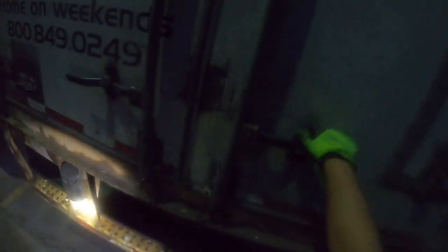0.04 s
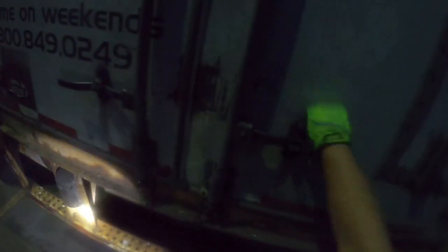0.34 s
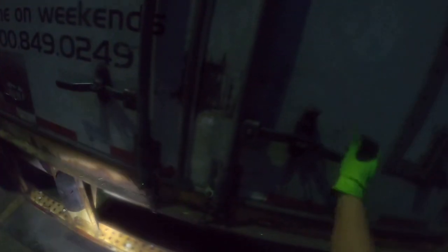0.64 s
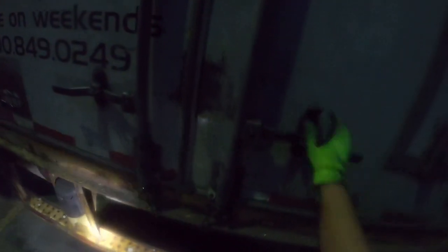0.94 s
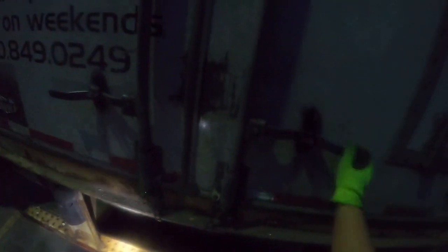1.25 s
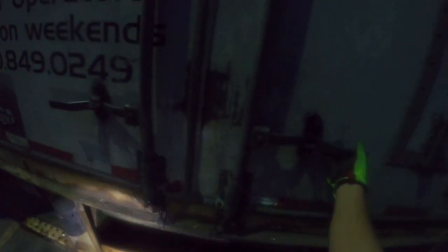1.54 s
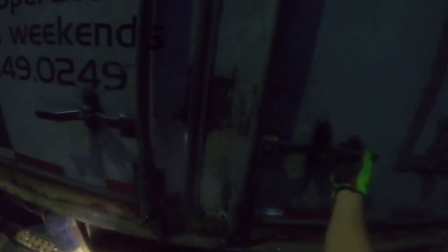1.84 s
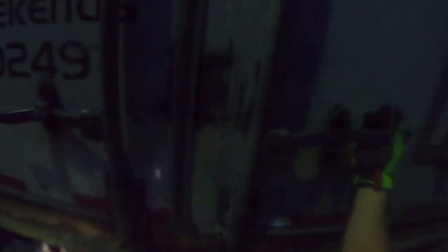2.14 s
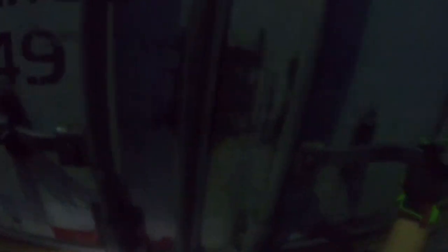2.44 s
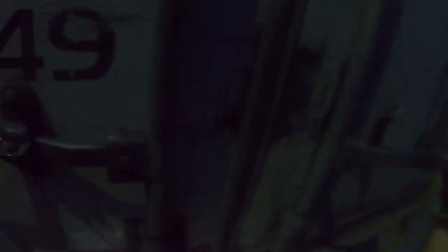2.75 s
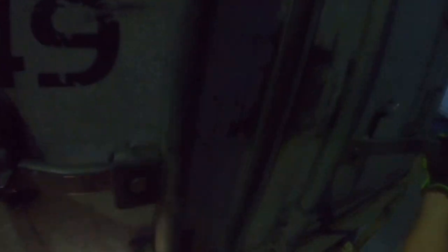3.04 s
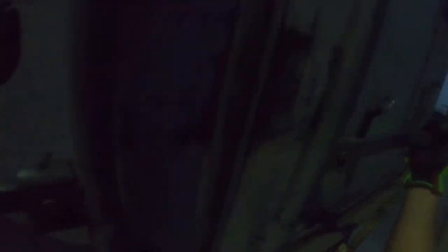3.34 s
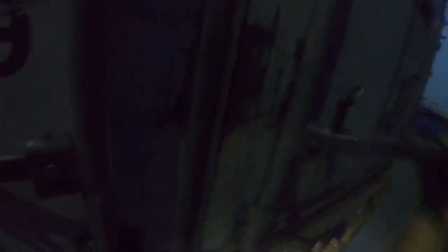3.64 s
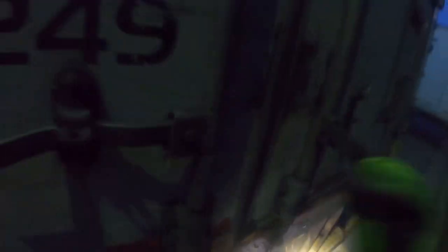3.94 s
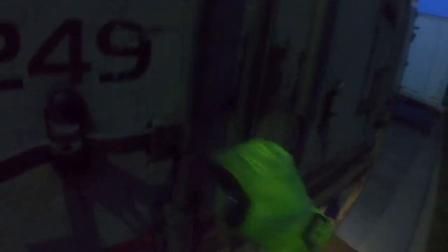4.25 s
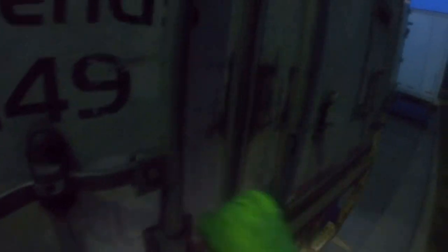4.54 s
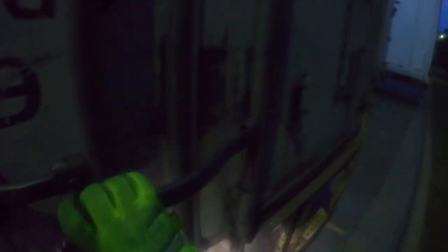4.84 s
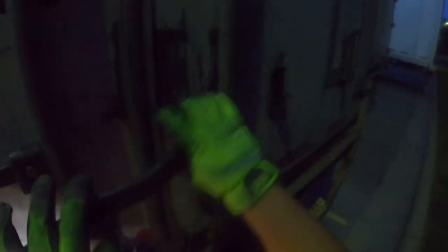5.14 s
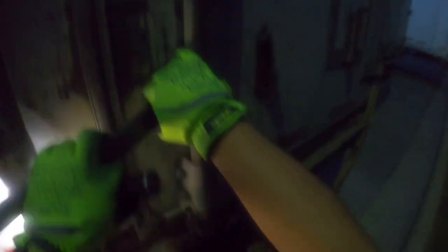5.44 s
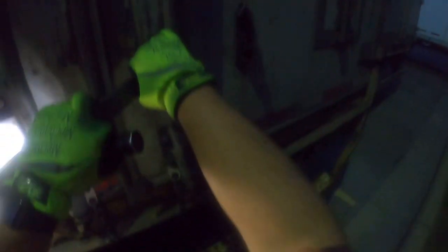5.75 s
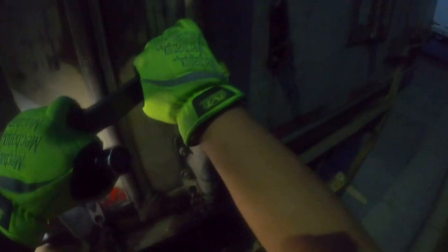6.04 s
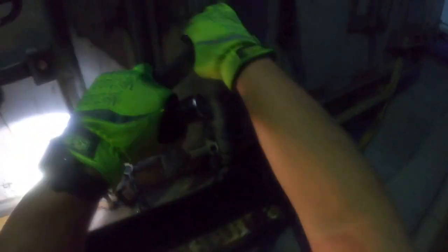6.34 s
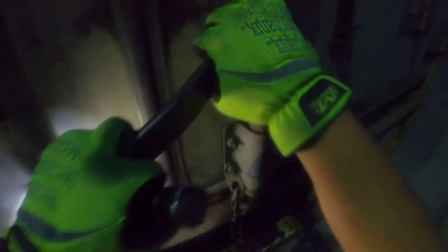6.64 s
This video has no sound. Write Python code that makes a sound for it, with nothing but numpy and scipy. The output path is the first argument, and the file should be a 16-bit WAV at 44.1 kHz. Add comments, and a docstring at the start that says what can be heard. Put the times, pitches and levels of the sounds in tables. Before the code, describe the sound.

A small steel latch rattles and drops with a sharp click. Then a trailer door's handle and lock rod clank, judder and squeak in uneven bursts, making the door boom hollowly. After a lull with faint glove rubbing come duller knocks, ticks and a short squeal. The microphone is very close, outdoors in an echoing yard, with an engine idling far off.

```python
"""A trailer yard at night: the lock rods of a door are worked by hand, close to a body-worn camera.
A steel keeper clicks and drops; handles and cams knock, exciting the modes of the door panel and bars.
The stiff rod judders and squeaks by stick-slip friction; gloves rub and loose pins tick.
Parked trailers echo, and an engine idles far off under a wash of traffic."""
import sys
import numpy as np
from scipy import signal
from scipy.fft import rfft, irfft
from scipy.io import wavfile
from scipy.ndimage import map_coordinates

SR = 44100
rng = np.random.default_rng(int(sys.argv[2]) if len(sys.argv) > 2 else 0)


def unload_wav(signal):
    """Save mono or channel-first audio to the path in sys.argv[1] as 16-bit WAV at rate SR, clipped to [-1, 1]."""
    wavfile.write(
        sys.argv[1],
        SR,
        np.round(np.clip(np.atleast_2d(signal).T, -1, 1) * 32767).astype(np.int16),
    )


N = 303408
T = np.arange(SR) / SR  # one second of ring-out

# Levels in all tables are relative; each source applies its own gain.
# impacts of the keeper plate: t/s, click level/dB, f/Hz, t60/s, ring level/dB, clack level/dB
KEEPER_HITS = [(0.192, -12.5, 4200, 0.028, -14.5, -23), (0.241, -34, 1910, 0.069, -36, -31.5),
               (0.246, -26, 2300, 0.03, -38, -15), (0.252, -18.5, 2600, 0.12, -37, -25),
               (0.272, -26, 2410, 0.06, -41, -26), (0.304, -31, 2500, 0.054, -44, -38),
               (0.314, -13.5, 3380, 0.028, -25, -17.5), (0.33, -17, 2500, 0.035, -27, -30),
               (0.342, -28, 1700, 0.08, -44, -27), (0.372, -11.5, 3200, 0.042, -18.5, -21),
               (0.383, -21, 4130, 0.043, -24, -20.5), (0.426, -28, 3350, 0.023, -28.5, -30.5),
               (0.525, -26, 2560, 0.009, -44, -28), (1.024, -28, 2423, 0.12, -47, -27),
               (1.033, -12, 3950, 0.033, -28, -23), (1.041, -17, 2440, 0.039, -25, -22.5),
               (1.057, -5.5, 3280, 0.012, -27, -16), (1.062, -9.5, 1590, 0.014, -44, -18)]
# spectra of a steel contact's click, its high sizzle and grinding rust: f/Hz, level/dB
CLICK_SPECTRUM = [(800, -57.5), (1900, -3), (2650, 4), (4000, -1), (5000, -4), (6500, -21.5), (10000, -39)]
SIZZLE_SPECTRUM = [(3000, -36), (5200, 8.5), (7000, 6), (8600, 6.5), (10500, -3), (11800, -10),
                   (13000, -11), (14500, -27), (16000, -24)]
GRIT_SPECTRUM = [(150, -0.5), (500, 6.5), (1000, 9.5), (1700, 4), (3000, -3.5), (5000, -14.5), (9000, -28),
                 (16000, -43)]


def amp(db):
    return 10 ** (np.asarray(db) / 20)


def unit(x):
    return x / np.sqrt(np.mean(x ** 2) + 1e-20)


def along(points, hz):
    """Interpolation of (f/Hz, value) points on a logarithmic frequency axis."""
    f, v = np.transpose(points)
    return np.interp(np.log(hz + 1), np.log(f + 1), v)


def wobble(rate, size):
    """Smooth random modulation with rate knots a second."""
    return map_coordinates(rng.standard_normal(4096), [np.arange(size) * rate / SR], mode="wrap")


def fade(t, t60):
    """Exponential decay by 60 dB in t60."""
    return np.exp(-np.log(1000) * t / np.maximum(t60, 1e-3))


def add(track, s, x):
    """Superposition of x on the track from time s."""
    part = track[max(round(s * SR), 0):][:len(x)]
    part += x[:len(part)]


def stroke(length, edge):
    """Time axis and raised-cosine envelope of one push."""
    t = T[:int(length * SR)]
    return t, np.sin(np.pi / 2 * np.clip(np.minimum(t, length - t) / edge, 0, 1)) ** 2


def coloured(x, spectrum, size=16384):
    """Minimum-phase filter that keeps the power of white noise."""
    gain = unit(amp(along(spectrum, np.fft.rfftfreq(size, 1 / SR))))
    cepstrum = irfft(np.log(gain + 1e-6))
    cepstrum[1:size // 2] *= 2
    cepstrum[size // 2 + 1:] = 0
    response = irfft(np.exp(rfft(cepstrum)))
    return signal.oaconvolve(x, response[None] if x.ndim > 1 else response, axes=-1)[..., :N]


def resonant(x, hz, q, boost):
    """Resonance lifts one band, a broad one when the part is damped by the hand."""
    return x + boost * signal.lfilter(*signal.iirpeak(hz, q, SR), x)


def ring(modes, centre_hz, focus_db, attack, shift=0):
    """Modal superposition favouring centre_hz: the striking point sets strengths and signs."""
    hz, db, t60 = np.transpose(modes)[:, :, None]
    db = db - focus_db * np.log2(hz / centre_hz) ** 2 + 2 * rng.standard_normal(hz.shape)
    weights = amp(db) * rng.choice([-1, 1], hz.shape)
    hz = hz * np.exp(shift * rng.standard_normal(hz.shape))  # grip and load detune the modes
    t = T[:int(t60.max() * SR)]
    partials = weights * np.sin(2 * np.pi * hz * t) * fade(t, t60)
    return np.sum(partials, axis=0) * (1 - fade(t, attack)) / np.linalg.norm(weights)


def contact(t60, chatter_db, crack=0.65):
    """Impact excitation: steel meets steel with a hard crack, then a dying chatter."""
    t = T[:SR // 6]
    envelope = 0.77 * fade(t, t60) + crack * fade(t, 0.0066)
    burst = envelope * rng.standard_normal(len(t)) * amp(chatter_db * wobble(998, len(t)))
    return burst * np.linalg.norm(envelope) / np.linalg.norm(burst)


def engine_and_traffic():
    """Distant noise sources: the engine's low rumble is coherent at both ports, the traffic less so."""
    # spectra of the two sources: f/Hz, level/dB
    engine_spectrum = [(12, -43.5), (20, 4), (38, -0.5), (54, 6.5), (68, -2), (81, -4.5), (118, -4.5),
                       (195, -19), (226, -17), (256, -23.5), (300, -16.5), (390, -25.5), (660, -120)]
    traffic_spectrum = [(120, -4), (250, -2), (500, 2.5), (1000, -1), (1600, -7.5), (3000, -17.5),
                        (5000, -24.5), (9000, -40.5), (16000, -76)]
    # swell of the rumble: t/s, level/dB
    swell = [(0.0, -34.5), (1.61, -40), (2.832, -33.5), (3.541, -38.5), (3.83, -30), (4.2, -38),
             (5.46, -38), (5.711, -31), (6.88, -37)]
    rumble = unit(coloured(rng.standard_normal(N) + 0.038 * rng.standard_normal((2, N)), engine_spectrum))
    wash = unit(coloured(rng.standard_normal(N) + 0.41 * rng.standard_normal((2, N)), traffic_spectrum))
    rumble_db = 2.5 + np.interp(np.arange(N) / SR, *np.transpose(swell))
    return amp(rumble_db) * rumble + amp(-47.5) * wash


def reverberate(x, t60s, onset, width):
    """A diffuse field at each microphone port, every frequency decaying at its own rate."""
    noise = rng.standard_normal(2 * SR) + width * rng.standard_normal((2, 2 * SR))
    hz, t, spectra = signal.stft(noise, SR, nperseg=256)
    decaying = spectra * fade(t, along(t60s, hz)[:, None]) * (1 - fade(t, onset))
    tail = signal.istft(decaying, SR, nperseg=256)[1]
    return signal.fftconvolve(x[None], tail / np.linalg.norm(tail[0]), axes=1)[:, :N]


def yard_echo(x):
    """Multiple reflection between parked trailers leaves a long, wide tail."""
    # spectrum of the reflections: f/Hz, level/dB
    echo_spectrum = [(100, -26), (500, 2.5), (900, -1.5), (1250, 4.5), (1700, -1.5), (2200, 2), (2800, 0.5),
                     (3400, -2), (4200, 0), (6000, 4), (9000, 1), (11500, -21), (16000, -43)]
    # reverberation time: f/Hz, t60/s
    echo_decay = [(200, 0.97), (1500, 2.17), (4000, 1.65), (6000, 0.43), (12000, 1)]
    return amp(-19) * reverberate(coloured(x, echo_spectrum), echo_decay, onset=0.0082, width=0.93)


def slap_echo(x, delay_s=0.13, cutoff_hz=1600):
    """Scattering off the next trailer's ribs returns each hit once, late, dull and smeared."""
    echo, t = np.zeros(N), T[:SR // 10]
    ribs = rng.standard_normal(len(t)) * fade(t, 0.19)
    dull = signal.sosfilt(signal.butter(2, cutoff_hz, fs=SR, output="sos"), x)
    add(echo, delay_s, amp(-17.5) * signal.oaconvolve(dull, ribs / np.linalg.norm(ribs)))
    return echo


def near_reflections(x, sway_s=0.3):
    """Early reflections off arm and door change as the body sways; the panel adds a short tail."""
    # decay of that tail: f/Hz, t60/s
    panel_decay = [(200, 0.06), (1500, 0.26), (5000, 0.026), (12000, 0.19)]
    t, hop = T[:SR // 100], int(sway_s * SR)
    bright = signal.sosfilt(signal.butter(1, 1500, "high", fs=SR, output="sos"), x)
    early = np.zeros((2, N))
    for start in range(0, N, hop):
        paths = rng.standard_normal((2, len(t))) * fade(t, 0.036) * (1 - fade(t, 0.00069))
        for port, path in zip(early, paths):
            reflected = signal.fftconvolve(bright[start:start + hop], path / np.linalg.norm(path))
            add(port, start / SR, reflected)
    return amp(-3) * early + amp(-14) * reverberate(x, panel_decay, onset=0.005, width=0.083)


def ports(x, lag_samples):
    """Time and level differences: a source on the right reaches the left port later and duller."""
    # left port against right: f/Hz, level/dB
    left_shading = [(100, 0), (2400, 0), (4400, -.8), (8100, -2), (12000, -6), (15000, -7)]
    hz = np.fft.rfftfreq(N, 1 / SR)
    skew = amp(along(left_shading, hz) / 2) * np.exp(-1j * np.pi * hz * lag_samples / SR)
    return irfft(rfft(x) * [skew, 1 / skew], N)


def gloves():
    """Sliding friction: gloves rub along the handles, the cloth catching and letting go."""
    # rubs: t/s, duration/s, level/dB
    slides = [(1.726, 0.27, -58), (4.097, 0.34, -66), (4.886, 0.49, -50.5), (5.104, 0.16, -52.5),
              (5.278, 0.18, -50), (5.616, 0.28, -49.5), (6.22, 0.19, -47.5), (6.683, 0.25, -54)]
    # spectrum of rubbed cloth: f/Hz, level/dB
    cloth = [(800, -12), (2500, 1), (4000, -0.5), (7500, -7), (10000, -13), (14000, -25), (16000, -40)]
    rub = np.zeros(N)
    for s, length, db in slides:
        add(rub, s, amp(db) * stroke(length, edge=length / 2)[1])
    crinkle = amp(2.5 * unit(wobble(45, N) + wobble(260, N)))
    return rub * crinkle * coloured(rng.standard_normal((2, N)), cloth)


def rustle(count=260, grip_s=1.0, closing_s=0.8):
    """Friction noise of glove and grit comes in random bursts once the hand closes on the handle."""
    held = np.clip((np.arange(N) / SR - grip_s) / closing_s, 0, 1)
    bursts, t = np.zeros(N), T[:SR // 30]
    envelope = fade(t, 0.07) * (1 - fade(t, 0.0036))
    for s, spread in zip(rng.uniform(0, N / SR, count), rng.standard_normal(count)):
        add(bursts, s, amp(4 * spread) * rng.standard_normal(len(t)) * envelope)
    crackle = coloured(bursts, CLICK_SPECTRUM) + amp(-2) * coloured(bursts, SIZZLE_SPECTRUM)
    return amp(-64) * held * crackle


def ticks(q=6):
    """Loose links and pins tap the handle, each exciting a resonance of its own."""
    # taps: t/s, level/dB, f/Hz
    pin_hits = [(1.658, -49, 3940), (1.794, -48, 4200), (1.936, -52, 7000), (2.083, -43, 3850),
                (2.207, -51, 5500), (2.248, -42, 4300), (2.304, -48, 3600), (2.639, -27.5, 4530),
                (2.847, -37, 4500), (3.289, -51, 4500), (3.648, -25.5, 5250), (5.306, -41, 3500),
                (5.932, -27, 3730), (5.953, -24, 2830), (6.081, -52, 3700), (6.246, -44, 4150),
                (6.332, -32, 3700), (6.407, -21.5, 2840), (6.416, -22.5, 2790), (6.638, -45.5, 5150),
                (6.853, -38.5, 1980)]
    taps = np.zeros(N)
    for s, db, hz in pin_hits:
        burst = contact(t60=0.018, chatter_db=-5.5)
        tap = signal.lfilter(*signal.iirpeak(hz, q, SR), burst)
        add(taps, s, amp(db) * tap * np.linalg.norm(burst) / np.linalg.norm(tap))
    return taps


def scrapes(length=0.03):
    """Sliding friction just before parts seat: the longer a knock chatters, the louder its scrape."""
    scrape, t = np.zeros(N), T[:int(length * SR)]
    for s, clank_db, *_, t60 in landings():
        rub = amp(min(clank_db, -17) - 0.5) * t60
        add(scrape, s - length, rub * rng.standard_normal(len(t)) * fade(length - t, 0.44))
    return coloured(scrape, GRIT_SPECTRUM)


def bars():
    """Free vibration: a struck bar rings on, buzzing in its loose guides; a flicked hasp rings clean."""
    # blows on the bar: t/s, level/dB, centre f/Hz
    blows = [(1.522, -55.5, 7450), (1.961, -47, 7400), (2.329, -33.5, 6000), (2.337, -36, 4380),
             (3.355, -51, 6600), (3.972, -46, 7000), (4.524, -53, 7400), (5.66, -54, 7400),
             (5.945, -41, 2830)]
    # modes: f/Hz, level/dB, t60/s
    bar_modes = [(1040, -2, .4), (1620, -14, 0.45), (2070, -19, .4), (2610, 3, 0.32), (2860, -15, 0.24),
                 (3370, 7, 0.14), (4320, -7, 0.18), (4500, 19, 0.13), (5100, 1, 0.31), (7260, 8, 0.25),
                 (7400, 7.5, 0.5), (7550, -5, 0.27), (7640, -7, .17), (9320, -2, .13), (10200, -16, 0.18),
                 (11600, -7, 0.18), (12870, -21, 0.13), (13800, -17, 0.11)]
    hasp_modes = [(3850, 6, 0.14), (4570, 2.5, 0.4), (4920, -8, 0.23), (7520, 0, 0.27), (10900, -11, 0.36),
                  (13240, -18, 0.21)]
    ringing = np.zeros(N)
    for s, db, centre_hz in blows:
        tone = ring(bar_modes, centre_hz, focus_db=22, attack=0.003)
        add(ringing, s, amp(db) * tone * amp(5.8 * wobble(110, len(tone))))
    add(ringing, 6.789, amp(-40) * ring(hasp_modes, centre_hz=5800, focus_db=5, attack=0.002))
    return ringing


def squeaks(overtone_db=-29):
    """Self-excited vibration: friction locks on to a rod mode; a light touch rasps, a hard push sings."""
    # dry steel squeals: t/s, duration/s, first f/Hz, last f/Hz, level/dB, roughness
    squeals = [(2.339, 0.032, 1063, 1034, -22.5, 0.63), (2.651, 0.017, 1510, 1462, -36, 0.86),
               (2.675, 0.023, 1123, 1510, -25.5, 1.16), (2.862, 0.011, 1480, 1590, -31.5, 1.1),
               (3.391, 0.13, 1550, 1380, -51, 1.1), (3.477, 0.17, 1132, 1027, -45.5, 0.88),
               (3.575, 0.029, 1840, 2030, -31, 1), (3.653, 0.067, 945, 934, -27, 0.2),
               (3.762, 0.038, 1610, 1550, -34, 1.2), (4.396, 0.086, 1067, 970, -42, 0.68),
               (6.576, 0.026, 1486, 1405, -24, 0.4), (6.649, 0.079, 936, 907, -27.5, 0.63),
               (6.697, 0.066, 934, 937, -19, 0.26)]
    squeal = np.zeros(N)
    for s, length, first_hz, last_hz, db, rough in squeals:
        t, push = stroke(length, edge=0.26 * length)
        pitch = np.linspace(first_hz, last_hz, len(t)) * (1 + 0.075 * rough * wobble(450, len(t)))
        phase = 2 * np.pi * np.cumsum(pitch) / SR
        tone = np.sin(phase) + amp(overtone_db) * (np.sin(2 * phase) + np.sin(3 * phase) / 2)
        rasp = amp(6 * rough * wobble(160, len(t)))
        add(squeal, s, amp(db) * push * unit(tone * rasp))
    return squeal


def judder(uneven=0.04, grit_t60=0.069):
    """Stick-slip of the rod, slowing through each push: every slip shoves the door and grinds rust."""
    # turns of the rod: t/s, duration/s, first slip f/Hz, last slip f/Hz, shudder level/dB, grit level/dB
    turns = [(1.992, 0.034, 103.3, 86.3, -32, -43), (2.357, 0.088, 108.2, 91.7, -28, -42),
             (2.628, 0.15, 144.7, 117.8, -24, -41.5), (2.87, 0.089, 189.3, 155.3, -23.5, -48),
             (3.6, 0.014, 291, 271, -12.5, -27), (3.639, 0.058, 270.8, 214.8, -11.5, -22),
             (3.689, 0.072, 141.9, 128, -12.5, -21.5), (3.757, 0.042, 162, 135, -26, -25),
             (3.85, .17, 99.5, 80.6, -30.5, -40.5), (4.567, .17, 258.6, 215, -30, -45.5),
             (5.91, 0.094, 193, 161, -20, -36.5), (6.298, 0.1, 139.9, 113.4, -30, -38),
             (6.545, 0.13, 197.8, 162.9, -22, -47), (6.69, .075, 230, 201, -35.5, -36.5)]
    # spectrum of the shoves: f/Hz, level/dB
    shudder_spectrum = [(30, -30), (90, 10), (150, 4.5), (270, 4.5), (370, -7.5), (550, -10), (900, -19),
                        (3000, -77.5)]
    shoves, grit = np.zeros((2, N))
    for s, length, first_hz, last_hz, shudder_db, grit_db in turns:
        t, push = stroke(length, edge=0.0075)
        rate = np.linspace(first_hz, last_hz, len(t)) * np.exp(uneven * wobble(119.9, len(t)))
        cycles = np.cumsum(rate) / SR
        slips = unit(np.diff(np.floor(cycles), prepend=0) * amp(1.5 * wobble(142.5, len(t))))
        since_slip = cycles % 1 / rate
        grinding = unit(rng.standard_normal(len(t)) * fade(since_slip, grit_t60))
        add(shoves, s, amp(shudder_db) * push * (slips - np.mean(slips)))
        add(grit, s, amp(grit_db) * push * grinding)
    return coloured(shoves, shudder_spectrum) + coloured(grit, GRIT_SPECTRUM)


def door(thump_db=-21.5, thump_hz=108):
    """Panel modes: every knock makes the door boom, while the light keeper only thumps it."""
    # modes: f/Hz, level/dB, t60/s
    panel_modes = [(55, 5, 0.4), (79.8, 4, 0.49), (97.5, -4, 0.46), (116, 2, 0.29), (140.8, 1, 0.32),
                   (158.5, -1.5, 0.24), (184.2, 2, 0.29), (208.7, 0, 0.21), (230.5, 1, 0.14),
                   (256, -5, 0.2), (289, 6, 0.081), (344, -1, 0.17), (408.3, 1.5, 0.13), (495, -4, 0.064),
                   (532, 4, 0.075)]
    boom = np.zeros(N)
    pushes = [(s, boom_db, boom_hz) for s, _, _, _, boom_db, boom_hz, _ in landings()]
    pushes += [(s, db + thump_db, thump_hz) for s, db, *_ in KEEPER_HITS]
    for s, db, centre_hz in pushes:
        add(boom, s, amp(db + 3.5) * ring(panel_modes, centre_hz, focus_db=6.5, attack=0.015))
    return boom


def keeper():
    """The light plate drags, rattles and drops over its catch: returns impact noise and modal ring."""
    # modes: f/Hz, level/dB, t60/s
    plate_modes = [(2270, -11, 0.027), (2600, -14, 0.055), (3190, -9, 0.071), (3550, 2, 0.15),
                   (4054, 13, 0.042), (4770, 7.5, 0.032), (5600, 8.5, 0.022), (8074, 3.5, 0.099),
                   (12000, -14, 0.06), (13400, 2, 0.09)]
    # spectrum of the dull clack: f/Hz, level/dB
    clack_spectrum = [(150, -3.5), (450, -1.5), (800, -2.5), (1130, 5), (1400, 1), (1700, -1.5),
                      (2100, -11.5), (2700, 0.5), (4000, -14), (8000, -57)]
    clack, click, sizzle, plate, drag = np.zeros((5, N))
    for s, db, pitch_hz, t60, ring_db, clack_db in KEEPER_HITS:
        burst = contact(t60, chatter_db=1.5)
        sizzle_db = db - 12.5 + 9 * np.log2(pitch_hz / 3200)  # higher-pitched contacts sizzle more
        add(clack, s, amp(clack_db) * burst)
        add(click, s, amp(db - 4.5) * resonant(burst, pitch_hz, q=6, boost=1.05))
        add(sizzle, s, amp(sizzle_db) * contact(0.5 * t60, chatter_db=6))
        add(plate, s, amp(ring_db) * ring(plate_modes, pitch_hz, focus_db=6, attack=0.0014, shift=0.035))
    t, push = stroke(length=0.163, edge=0.015)
    add(drag, 0.26, amp(-35.5) * push * rng.standard_normal(len(t)))
    treble = coloured(click, CLICK_SPECTRUM) + coloured(sizzle, SIZZLE_SPECTRUM)
    return coloured(clack, clack_spectrum) + treble + coloured(drag, GRIT_SPECTRUM), plate


def landings(slack_s=0.013, rebound_hz=189):
    """Backlash: the rod has play, so each knock lands twice, the second time with a shorter chatter."""
    # handle, rod and cams against the door: t/s, clank level/dB, brightness/dB, clank f/Hz,
    # boom level/dB, boom f/Hz, t60/s, rebound level/dB
    blows = [(1.525, -32.5, -7.5, 573, -26.5, 240, 0.12, -7), (1.877, -40, -3, 1300, -35, 81, 0.17, -5.5),
             (1.961, -9, -9, 1430, -16.5, 102.5, 0.048, -4), (2.326, -12.5, -2.5, 755, -15, 84, 0.067, -4),
             (2.574, -33, -4.5, 1111, -38, 129, 0.087, -19), (2.627, -20, -18, 627, -18.5, 131, 0.036, 1.5),
             (2.657, -35, -22, 1390, -15.5, 110, 0.036, -19),
             (2.682, -21.5, -8.5, 1070, -16.5, 280, 0.18, -3.5),
             (2.722, -11.5, -13.5, 635, -11.5, 169, 0.076, -16.5),
             (2.866, -24, -9, 1450, -18.5, 89, 0.17, -15), (3.355, -21.5, -3, 1640, -51, 79, 0.034, -22),
             (3.612, -14, -3.5, 1050, -11, 147, 0.13, -2.5), (3.668, -16.5, -6.5, 920, -9.5, 260, 0.2, -12),
             (3.71, -20.5, -5.5, 1200, -24, 127, 0.2, -2), (3.758, -18, -8, 1700, -20, 135, 0.16, -13),
             (3.829, -14.5, -10, 564, -15.5, 240, 0.14, -1), (3.888, -19.5, -6.5, 1300, -26, 180, 0.1, -10),
             (3.917, -22.5, -23, 1380, -24, 141, 0.06, -13),
             (3.972, -18.5, -5.5, 940, -24.5, 82, 0.088, -0.5), (4.02, -23, -38, 556, -22, 215, 0.17, -21),
             (4.522, -25, -7, 2850, -28, 189, 0.028, -26), (4.546, -13.5, -14, 536, -18, 143, 0.095, -14),
             (4.746, -35, -1.5, 2200, -24, 139.3, 0.11, -32), (5.229, -30, -15, 1300, -53, 81, 0.03, -15),
             (5.659, -25, -10, 475, -19.5, 84, 0.047, -16), (5.752, -12, -27.5, 384, -17, 320, 0.074, -9),
             (5.86, -30, -3, 1910, -21.5, 100, 0.09, -21), (5.868, -15, -25, 424, -15, 199, 0.083, -13.5),
             (5.915, -27.5, -20, 352, -18.5, 278, 0.12, 2.5), (5.944, -12, -17, 520, -14, 82, 0.11, -8),
             (6.111, -28, -15.5, 560, -48, 191, 0.031, -23), (6.284, -16, -21, 459, -15, 91, 0.089, -12.5),
             (6.332, -18.5, -16, 477, -20.5, 189.4, 0.032, 2),
             (6.403, -17.5, -8, 2780, -26, 352, 0.025, -2.5), (6.484, -17, -39, 920, -18, 130, 0.043, -6),
             (6.575, -8.5, -25.5, 493, -13.5, 85, 0.052, -3), (6.64, -17, -22, 900, -24.5, 135, 0.094, 2.5),
             (6.788, -26.5, -8, 1500, -43, 81, 0.065, -20)]
    for s, db, bright_db, pitch_hz, boom_db, boom_hz, t60, rebound_db in blows:
        yield s, db, bright_db, pitch_hz, boom_db, boom_hz, t60
        yield (s + slack_s, db + rebound_db, bright_db, pitch_hz,
               boom_db + rebound_db, rebound_hz, 0.64 * t60)


def knocks():
    """Impacts of handle, rod and cams: contact hardness makes bare steel brighter than a cushioned blow."""
    # modes of the hollow rod: f/Hz, level/dB, t60/s
    rod_modes = [(331, -4, 0.11), (424, -6, 0.045), (547, -2, 0.097), (710, -16, 0.031), (945, -1.5, 0.16),
                 (1245, 1.5, 0.038), (1427, -2.5, 0.18), (1652, -7.5, 0.06), (1914, 0, 0.057),
                 (2590, -1, .04), (2900, -12, 0.037)]
    # spectrum of a heavy contact: f/Hz, level/dB
    clank_spectrum = [(100, -19), (250, -7.5), (400, 2.5), (650, -0.5), (950, 0.5), (1450, 1), (2000, -3),
                      (2700, -11), (4000, -24), (8000, -82)]
    clank, clang, click, sizzle = np.zeros((4, N))
    for s, db, bright_db, pitch_hz, _, _, t60 in landings():
        burst = contact(t60, chatter_db=3.5)
        add(clank, s, amp(db - 8) * resonant(burst, pitch_hz, q=2.2, boost=1.67))
        add(clang, s, amp(db - 7) * ring(rod_modes, pitch_hz, focus_db=0.8, attack=0.0069, shift=0.06))
        add(click, s, amp(db + 0.5 + bright_db) * contact(0.76 * t60, chatter_db=4.5))
        add(sizzle, s, amp(db - 6 + 2.03 * bright_db) * contact(1.75 * t60, chatter_db=3))
    treble = coloured(click, CLICK_SPECTRUM) + coloured(sizzle, SIZZLE_SPECTRUM)
    return clang + coloured(clank, clank_spectrum) + treble


def scene():
    """Superposition of direct sound, near reflections, the trailer's box and the yard."""
    # sent into the yard echo, soft for the keeper's first rattle, loud for its final drop: t/s, level/dB
    echo_send = [(.55, -4), (1.0, 2.5)]
    box_decay = [(60, 1.47), (300, 2.87)]  # the hollow trailer rumbles on: f/Hz, t60/s
    t = np.arange(N) / SR
    impacts, plate = keeper()
    rod = knocks() + scrapes() + squeaks() + ticks() + rustle()
    slips, boom = judder(), door()
    steel = impacts + plate + rod + slips + bars()
    near = near_reflections(steel)
    hollow = amp(-9) * reverberate(boom, box_decay, onset=0.028, width=0.03)
    thrown = impacts * amp(np.interp(t, *np.transpose(echo_send))) + amp(-2) * rod + amp(-13) * slips
    far = yard_echo(thrown) + slap_echo(thrown)
    # the worker steps across to face the second handle, so the ports hear it almost together
    facing = np.clip((t - 4.8) / 0.5, 0, 1)
    source = steel + boom
    direct = ports(source * (1 - facing), lag_samples=1.81) + ports(source * facing, lag_samples=1)
    return direct + near + hollow + far + gloves() + engine_and_traffic()


def record(dry):
    """Soft saturation and band limiting: the camera rounds off peaks and cuts the highest treble."""
    ceiling, top_hz = 0.95, 15800
    rounded = dry / (1 + np.abs(dry / ceiling) ** 6) ** (1 / 6)
    return irfft(rfft(rounded) * (np.fft.rfftfreq(N, 1 / SR) < top_hz), N)


dry = scene()
out = record(dry)
unload_wav(out)
```